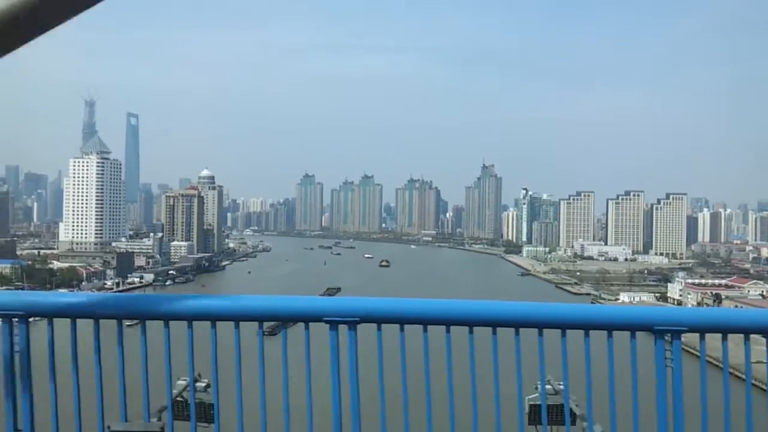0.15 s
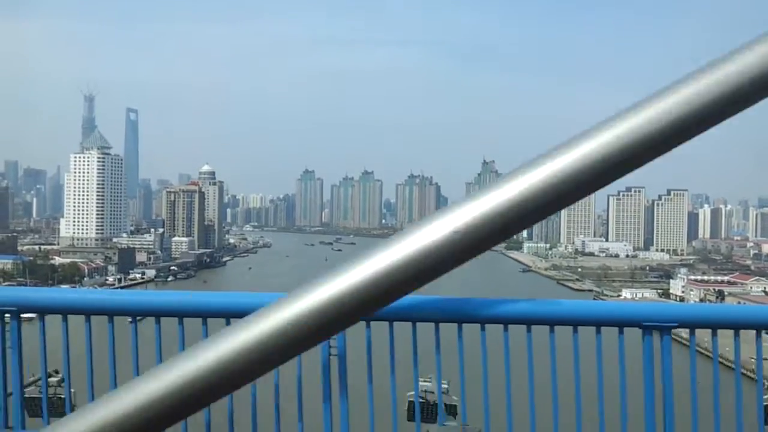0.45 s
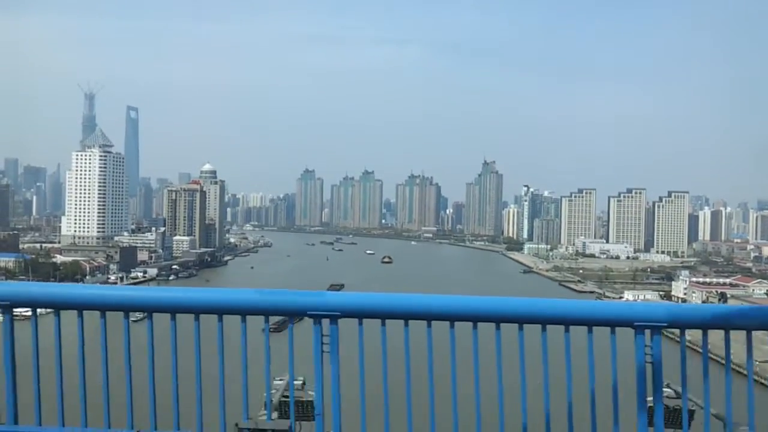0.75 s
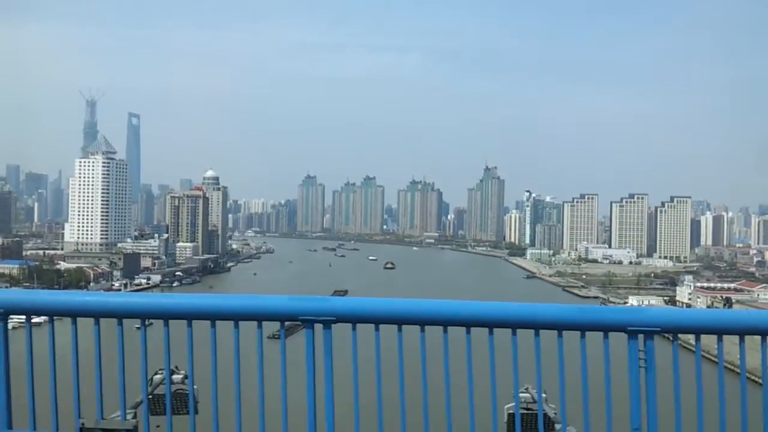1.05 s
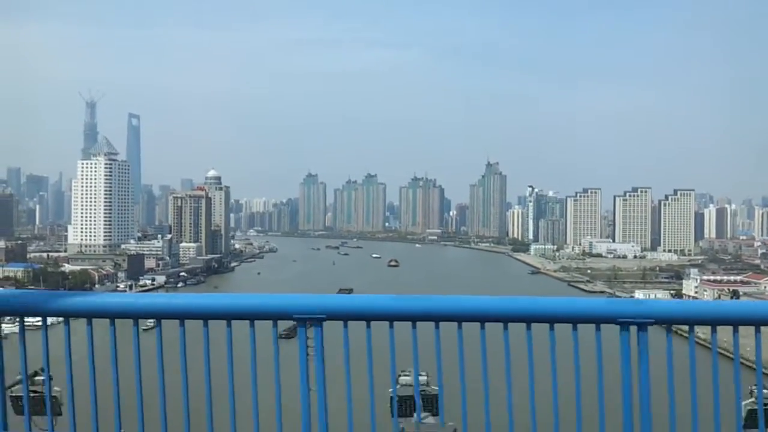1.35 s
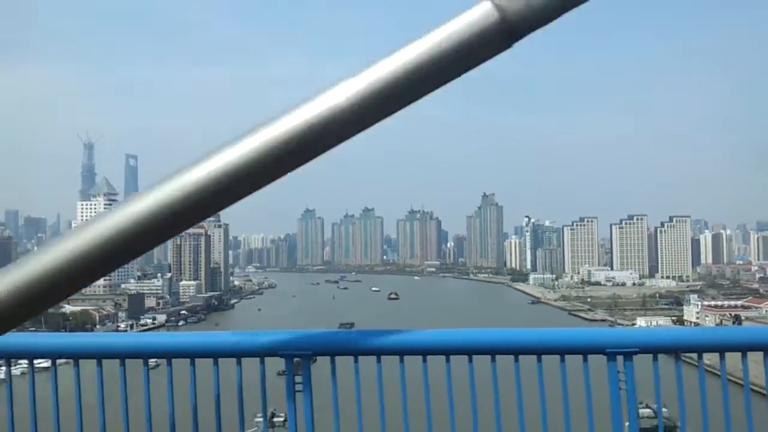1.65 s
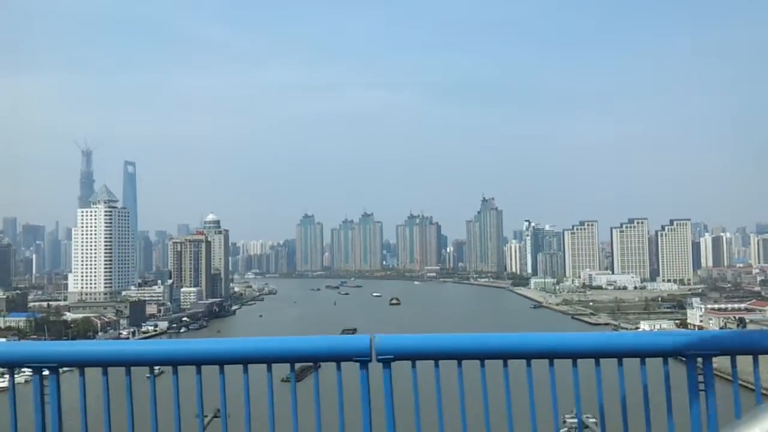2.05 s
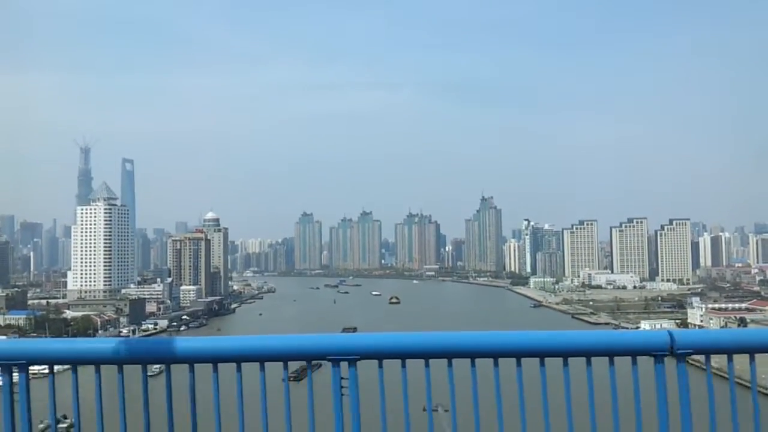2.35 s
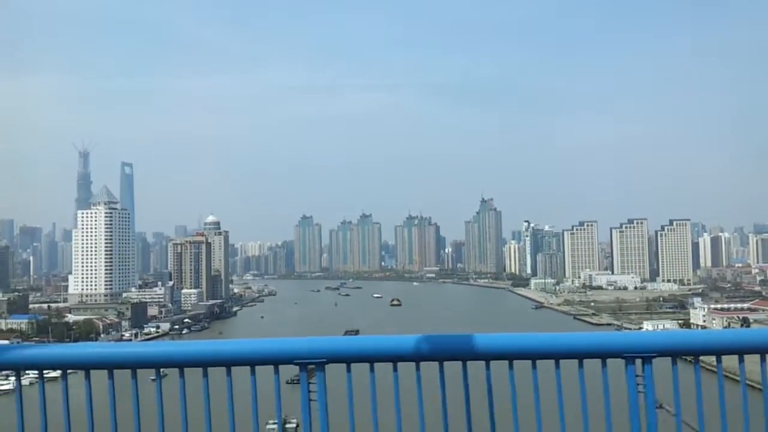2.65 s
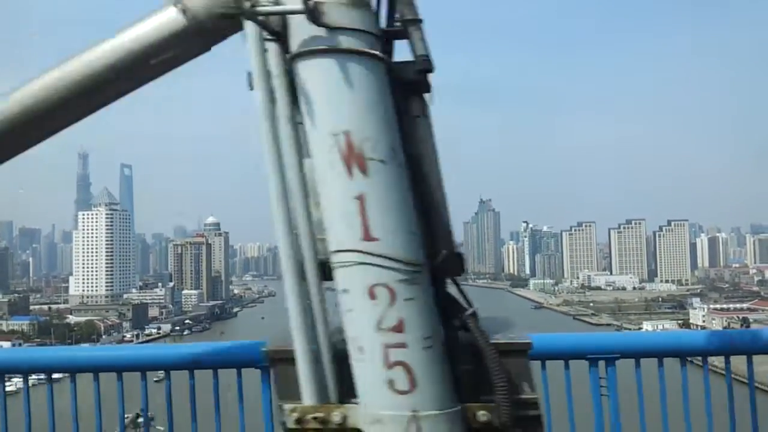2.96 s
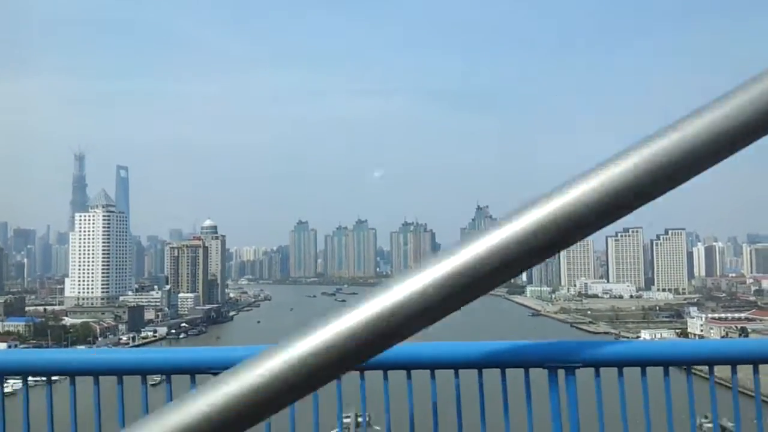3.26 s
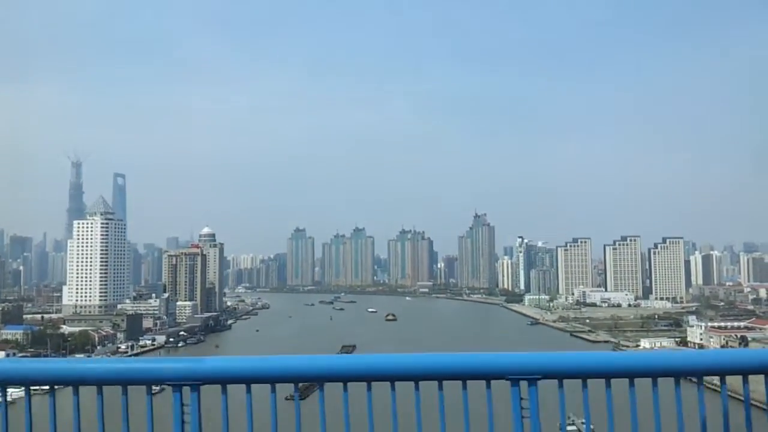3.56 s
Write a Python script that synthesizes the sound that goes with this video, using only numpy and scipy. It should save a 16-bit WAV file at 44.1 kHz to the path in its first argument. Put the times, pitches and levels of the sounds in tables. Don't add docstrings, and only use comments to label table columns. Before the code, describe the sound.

Low vehicle cabin rumble crossing a bridge deck, with thumps over joints and rattling trim clicks

```python
import sys
import numpy as np
from scipy import signal
from scipy.fft import rfft, irfft, next_fast_len
from scipy.io import wavfile
from scipy.ndimage import uniform_filter1d

SR = 44100
rng = np.random.default_rng(int(sys.argv[2]) if len(sys.argv) > 2 else 0)


def generate_wav(signal):
    frames = np.transpose(np.atleast_2d(signal))
    scaled = np.clip(frames, -1, 1) * 32767
    pcm = np.round(scaled).astype(np.int16)
    wavfile.write(sys.argv[1], SR, pcm)


def amplitude_ratio(level_db):
    exponent = np.asarray(level_db, float) / 20
    return 10 ** exponent


N = 164052

# time_s, level_db
ROUGHNESS = [(0.0, -22.5), (0.42, -20), (1.81, -23.5), (1.87, -20.5), (1.9, -24), (2.15, -22.5),
             (2.22, -24), (2.69, -22.5), (2.72, -23), (3.01, -22), (3.69, -20.5), (3.72, -22)]


def rms_one(x):
    return x / np.sqrt(np.mean(x ** 2) + 1e-20)


def in_time(rows):
    return np.interp(np.arange(N) / SR, *np.transpose(rows))


def at_hz(rows, hz, axis=1):
    rows = np.array(rows)
    return np.interp(np.log(hz), np.log(rows[:, 0]), rows[:, axis])


def drift(rate):
    r = np.exp(-80 * np.pi * rate / SR)
    chance = rng.standard_normal(N // 40 + 602)
    slow = signal.lfilter([1], [1, -2 * r, r * r], chance)[600:]
    return np.interp(np.arange(N) / 40, np.arange(len(slow)), rms_one(slow))


def ring(clicks, hz, t60):
    r, w = amplitude_ratio(-60 / (t60 * SR)), 2 * np.pi * hz / SR
    return signal.lfilter([0, np.sin(w)], [1, -2 * r * np.cos(w), r * r], clicks + 1e-18)


def pan(db):
    return amplitude_ratio(np.array([[db / 2], [-db / 2]]))


def swell(start, length, edge):
    t = np.arange(N) / SR - start
    return np.clip(np.minimum(t, length - t) / edge, 0, 1)


def dull(x, top_hz):
    return signal.sosfilt(signal.butter(8, min(top_hz, .45 * SR), fs=SR, output="sos"), x)


def noise(spectrum, low_hz, high_hz, patchy_db, rate, count):
    # pitch_hz, likeness
    likeness_rows = [(60, 0.98), (130, .99), (290, 0.91), (640, 0.6), (1410, 0.25), (3100, 0.16),
                     (6820, 0.16), (15000, 0.51)]
    # pitch_hz, lead_rad
    lead_rows = [(150, -0.055), (690, -0.25), (1400, -2.23), (7000, -1.73)]
    # pitch_hz, balance_db
    lean_rows = [(60, 2), (250, 0.5), (550, -1.6), (1100, 3.5), (3000, 2.5), (15000, -0.5)]
    size = next_fast_len(N)
    hz = np.arange(size // 2 + 1) * SR / size + 1e-3
    alike = np.clip(at_hz(likeness_rows, hz), 0, .999)
    lean = amplitude_ratio(at_hz(lean_rows, hz) / 2)
    left, other = rfft(rng.standard_normal((2, size))) * amplitude_ratio(at_hz(spectrum, hz))
    delayed = np.exp(-1j * at_hz(lead_rows, hz)) * left
    right = alike * delayed + np.sqrt(1 - alike ** 2) * other
    pair = np.array([left * lean, right / lean])
    place = count * np.log(hz / low_hz) / np.log(high_hz / low_hz) - .5
    together, out = drift(rate / 4), 0
    for k in range(count):
        share = np.cos(np.pi / 2 * np.clip(place - k, -1, 1)) ** 2
        flicker = np.exp(patchy_db / 8.686 * (.6 * together + drift(rate)))
        out = out + irfft(pair * share, size)[:, :N] * flicker
    return rms_one(out)


def body_boom():
    # time_s, level_db
    heave_rows = [(0.0, -22.5), (0.06, -17), (0.41, -18), (0.44, -26.5), (0.66, -14.5), (0.79, -36),
                  (0.81, -19), (1.36, -24), (2.47, -20.5), (2.55, -13), (2.6, -32), (2.69, -13.5),
                  (3.01, -40), (3.05, -21), (3.64, -13.5), (3.72, -19)]
    # pitch_hz, level_db_per_hz
    boom_rows = [(5.9, -23), (10, 4.5), (28, 0.5), (60, -10.5), (78, -45), (130, -120)]
    even_share, even_s = 1, .07
    boom = noise(boom_rows, 10.2, 51.3, patchy_db=1.8, rate=6.7, count=3)
    power = uniform_filter1d(np.mean(boom ** 2, 0), int(even_s * SR))
    return amplitude_ratio(in_time(heave_rows) + 2.5) * rms_one(boom / power ** (even_share / 2))


def deck_rumble():
    # pitch_hz, level_db_per_hz
    rumble_rows = [(26, -38), (45, -2.5), (65, -4), (126, -7), (199, -13.5), (252, -13.5), (443, -24),
                   (480, -25), (620, -34), (1060, -120)]
    rumble = noise(rumble_rows, 39, 530, patchy_db=1.47, rate=22.7, count=5)
    return amplitude_ratio(in_time(ROUGHNESS) + 1.35) * rumble


def deck_swing_db():
    rough_db = in_time(ROUGHNESS)
    return rough_db - rough_db.mean()


def tyre_roar():
    # pitch_hz, level_db_per_hz
    roar_rows = [(280, -66), (480, -2), (614, -5), (687, -5.5), (1030, -5), (1110, -5), (1410, -5.5),
                 (2100, -19), (2730, -29), (4620, -120)]
    level_db, follows = -34.5, 0.33
    roar = noise(roar_rows, 434, 2090, patchy_db=0.64, rate=23.0, count=4)
    return amplitude_ratio(level_db + follows * deck_swing_db()) * roar


def air_hiss():
    # pitch_hz, level_db_per_hz
    hiss_rows = [(2000, -1), (2800, 6), (3600, -2.5), (4600, -13.5)]
    level_db, follows, rise_db = -40.5, 0.48, 1.5
    hiss_db = level_db + follows * deck_swing_db() + rise_db * swell(2.9, 2, 0.31)
    return amplitude_ratio(hiss_db) * noise(hiss_rows, 1770, 5550, patchy_db=1.27, rate=13.0, count=2)


def window_seal():
    # time_s, level_db
    draught_rows = [(0.0, -52.5), (0.41, -53.5), (0.49, -49.5), (0.61, -54), (0.79, -53), (1.37, -49.5),
                    (1.65, -48), (1.78, -45.5), (2.02, -51), (3.04, -50.5), (3.25, -57), (3.46, -54),
                    (3.63, -51.5), (3.72, -54)]
    # pitch_hz, level_db_per_hz
    seal_rows = [(4200, 4), (5300, -1.5), (6500, 3.5), (8000, 1), (9000, -9), (9800, -22.5), (16000, -32)]
    seal = noise(seal_rows, 4000, 17000, patchy_db=2.73, rate=15.0, count=4)
    return amplitude_ratio(in_time(draught_rows) + 2.95) * seal


def rustles():
    # start_s, length_s, rms_db, pan_db, top_hz
    strokes = [(0.154, 0.019, -55, -2, 9500), (0.395, 0.03, -43, -2, 9800), (0.805, 0.019, -34.5, -3, 9600),
               (0.818, 0.023, -45.5, 1.5, 9500), (2.136, 0.032, -44, -9, 9600),
               (2.34, 0.049, -47.5, -15, 13500), (2.398, 0.083, -46.5, -5, 12200),
               (2.759, .016, -39.5, 0, 11500), (2.773, 0.041, -30, 1, 11600),
               (2.812, 0.026, -37.5, 0, 11800), (2.835, 0.048, -39, 0, 8850),
               (3.147, 0.045, -44.5, -20, 12000), (3.208, 0.058, -43.5, -11, 12900),
               (3.442, 0.099, -44, 11.5, 10700), (3.685, 0.036, -42, 5, 9800)]
    # pitch_hz, level_db_per_hz
    cloth_rows = [(2500, -2), (4500, -1.5), (7500, 4), (9000, -2.5), (11500, -15), (15000, -16)]
    grain = noise(cloth_rows, 2200, 16000, patchy_db=1.5, rate=60.0, count=3)
    grain = grain * amplitude_ratio(2.0 * drift(250.0))
    out = np.zeros((2, N))
    for s, length, db, pan_db, top_hz in strokes:
        out += amplitude_ratio(db) * pan(pan_db) * swell(s, length, 0.16 * length) * dull(grain, top_hz)
    return out


def squeals():
    # start_s, end_s, width_hz, level_db
    whistles = [
        (.35, .6, 120, -66),
        (.65, .97, 120, -61),
        (.95, 1.15, 130, -62),
        (1.13, 2.07, 65, -52),
        (2.09, 2.41, 65, -55),
        (2.445, 2.52, 70, -54),
        (1.13, 2.4, 110, -61),
        (1.56, 2.57, 30, -51),
        (1.825, 1.875, 30, -42),
        (1.09, 1.19, 30, -50),
    ]
    pitches = [13250, 13280, 14600, 13690, 13640, 13600, 13150, 8295, 2960, 1980]
    steadiness = [0, 0, 0, 0, 0, 0, 0, .7, .95, .9]
    sag_per_s, edge_s, flicker_db, high_pan_db = .017, 0.013, 2, 8
    out, t = np.zeros((2, N)), np.arange(N) / SR
    for (start, end, width_hz, db), hz, steady in zip(whistles, pitches, steadiness):
        pitch_hz = hz * (1 - sag_per_s * (t - start) * (hz < 9000))
        turn = 2 * np.pi * np.cumsum(pitch_hz) / SR
        cos, sin = np.cos(turn), np.sin(turn)
        a, b, c, d = (drift(width_hz) for k in range(4))
        first = 2 * steady * cos + (1 - steady) * (a * cos + b * sin)
        second = c * cos + d * sin
        both = np.array([first, .5 * first + .85 * (1 - steady) * second])
        both = both * pan(high_pan_db * (hz > 9000))
        flicker = flicker_db * (1.5 - steady / 2) * (drift(9.0) + .6 * drift(30.0))
        out += both * amplitude_ratio(db + flicker) * swell(start, end - start, edge_s)
    return out


def knocks():
    # start_s, peak_db, pitch_hz, t60_s
    pushes = [
        (2.569, -20.5, 1323, 0.037),
        (2.6, -29, 1280, 0.03),
        (2.621, -30, 1335, 0.081),
        (2.661, -34, 1350, 0.072),
        (2.781, -32, 955, 0.18),
        (0.751, -15.5, 253, 0.24),
        (1.104, -16, 258, 0.094),
        (2.972, -13.5, 113, 0.31),
    ]
    out = np.zeros(N)
    for s, db, hz, t60 in pushes:
        click = np.zeros(N)
        click[int(s * SR)] = amplitude_ratio(db)
        out += ring(click, hz, t60)
    return out * pan(1.5)


def ticks():
    # start_s, peak_db, pan_db, length_s
    contacts = [(.7752, -26.5, -18, 0.0002), (2.3327, -19.5, -12, 0.0003), (2.4125, -29, 0, .0003),
                (2.4325, -31, 0, .0003), (2.461, -24, 2, 0.0004), (2.5205, -26, 11, 0.0004),
                (2.568, -31, 4, .0004), (2.616, -39, -2, .0003), (2.64, -42, 0, .0003),
                (2.6695, -33, -9, 0.0004), (2.675, -31, -8, 0.0004), (2.696, -39, 0, .0004),
                (2.7775, -39, 1, .0005), (2.7815, -31, 7, .001), (2.977, -25, -15, 0.0005),
                (2.9791, -16, -14, 0.0004), (3.1195, -15.5, -12, 0.0005), (3.123, -5, 10.5, 0.0009),
                (3.1362, -22, -4, 0.0003), (3.164, -26, -22, 0.0006), (3.5454, -11, 9, 0.0006),
                (3.5461, -11, 13, 0.0006), (3.5466, -10, 11, 0.0004)]
    # low_modes_db, high_modes_db, main_ring_hz, top_hz
    colours = [(-25, 3, 7500, 16500), (6, 0, 7200, 15500), (-8, 3, 7800, 11000), (-6, -6, 6000, 9000),
               (-3, -6, 6500, 7800), (0, -6, 5500, 7200), (0, -6, 6000, 7000), (-10, -6, 7000, 8500),
               (-10, -6, 7000, 8000), (-10, -3, 7500, 10000), (-8, -3, 7000, 10500), (-10, -6, 7500, 8300),
               (-8, -3, 6000, 11500), (-8, -2, 7700, 14500), (-10, -3, 7500, 11500), (0, -6, 7000, 13500),
               (-4, 3, 6500, 16000), (-15, -10, 6490, 16500), (-6, -6, 7300, 9500), (-8, -3, 7300, 11500),
               (-10, -6, 6300, 16000), (-10, 3, 7600, 15500), (-4, -4, 7500, 15500)]
    # pitch_hz, level_db, t60_s
    modes = [(1840, 6, .004), (3020, 2, 0.0022), (4700, -14, .0015), (8300, -3, 0.0015),
             (10800, -9, 0.0014), (15000, -18, .0015)]
    main_t60_s, rattle = .0024, 0.3
    tail_db, tail_t60_s = -30, .01
    size = 4000
    out, t = np.zeros((2, N + size)), np.arange(size) / SR
    draws = rng.standard_normal((len(contacts), 3, size))
    for (s, db, pan_db, length), (lows_db, highs_db, ring_hz, top_hz), draw in zip(contacts, colours, draws):
        push = (t == 0) + rattle * draw[0] * (t < length)
        push = push + amplitude_ratio(tail_db - 60 * t / tail_t60_s) * draw[1:]
        edge = np.diff(push, prepend=0)
        burst = ring(edge, ring_hz, main_t60_s)
        for hz, level_db, t60 in modes:
            mode_db = level_db + lows_db * (hz < 4000) + highs_db * (hz > 9000)
            burst = burst + amplitude_ratio(mode_db) * ring(push if hz < 4000 else edge, hz, t60)
        burst = dull(dull(burst, top_hz), top_hz)
        i = int(s * SR)
        out[:, i:i + size] += amplitude_ratio(db) * pan(pan_db) * burst / np.abs(burst).max()
    return out[:, :N]


def jolts():
    # start_s, rms_db, t60_s
    thuds = [
        (.805, -22, 0.33),
        (2.8, -19.5, .2),
        (2.771, -17.5, 0.43),
        (3.15, -21, 0.46),
    ]
    # pitch_hz, level_db_per_hz
    thud_rows = [(120, -5), (280, 0.1), (450, -7), (1000, -18), (2000, -28)]
    t, level = np.arange(N) / SR, np.zeros(N)
    for s, db, t60 in thuds:
        level += swell(s, t60, 0.013) * amplitude_ratio(db - 60 * np.maximum(t - s, 0) / t60)
    return noise(thud_rows, 120, 2800, patchy_db=-6.0, rate=14.0, count=3) * level


def gate(x):
    threshold_db_per_hz, from_hz, band_hz = -93.5, 4100, 690
    dip_hz, usual_dip_db, follows = 6300, 4.4, .5
    window = np.sqrt(signal.get_window("hann", 2048))
    layout = dict(nperseg=2048, noverlap=1024, window=window, scaling="psd")
    hz, _, frames = signal.stft(x, SR, boundary="odd", **layout)
    loud_db = 10 * np.log10(np.mean(np.abs(frames) ** 2, axis=(0, 1)) + 1e-20)
    dip_db = usual_dip_db + follows * (loud_db - loud_db.mean())
    band = ((hz - from_hz) // band_hz).astype(int)
    for k in range(band.max() + 1):
        power = 2 * np.mean(np.abs(frames[:, band == k]) ** 2, axis=(0, 1))
        threshold_db = threshold_db_per_hz + (from_hz + k * band_hz < dip_hz) * dip_db
        frames[:, band == k] *= power > amplitude_ratio(2 * threshold_db)
    return signal.istft(frames, SR, **layout)[1][:, :N]


def scene():
    ride = body_boom() + deck_rumble() + tyre_roar() + air_hiss() + window_seal()
    return gate(ride + rustles() + squeals() + knocks() + jolts()) + ticks()


def roll_off(x):
    return signal.sosfilt(signal.butter(12, 16490, fs=SR, output="sos"), x)


def record(dry):
    rounded = 1.56 * np.tanh(dry / 1.426)
    return roll_off(dull(rounded, 16400))


dry = scene()
out = record(dry)
generate_wav(out)
```